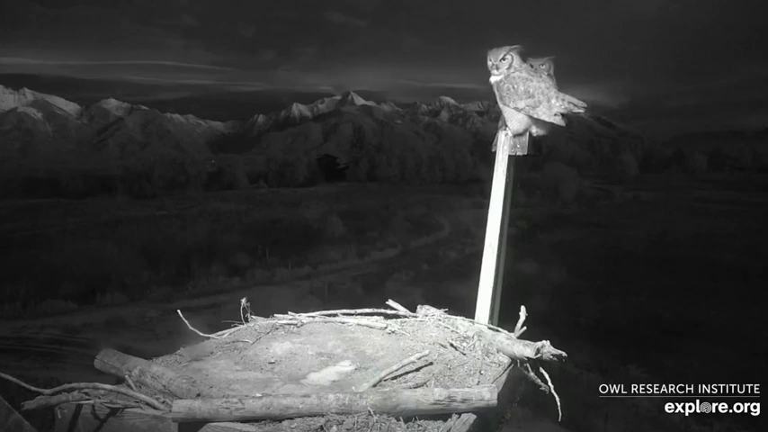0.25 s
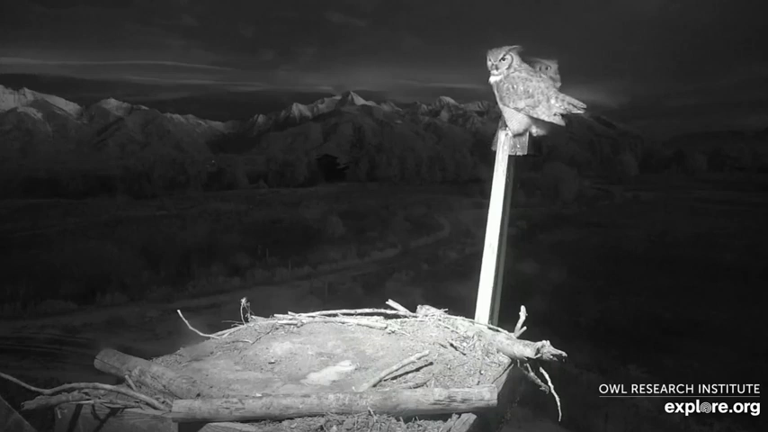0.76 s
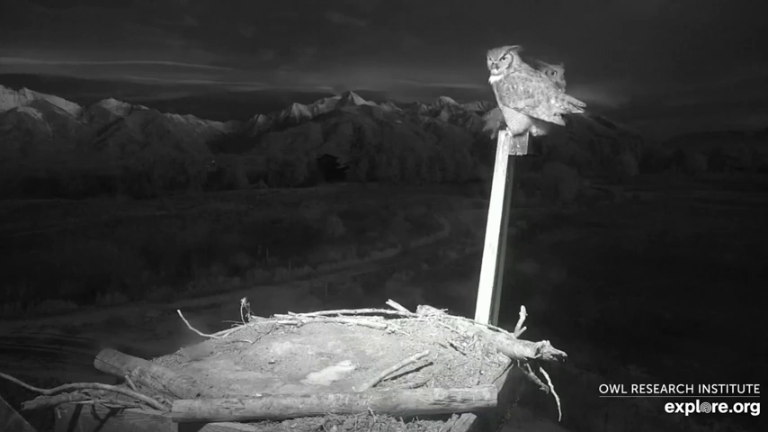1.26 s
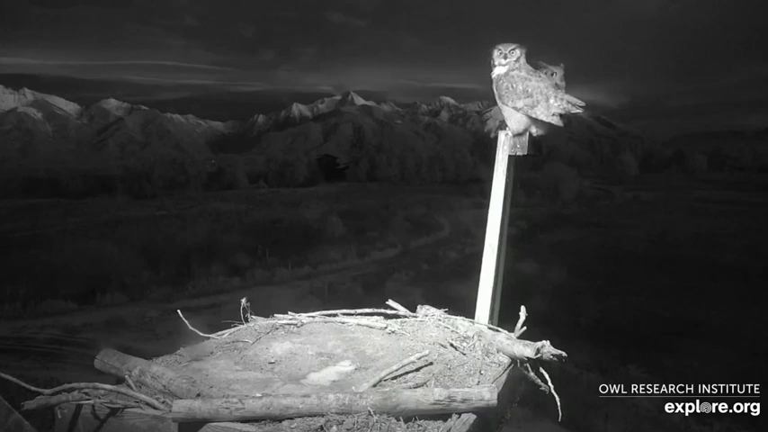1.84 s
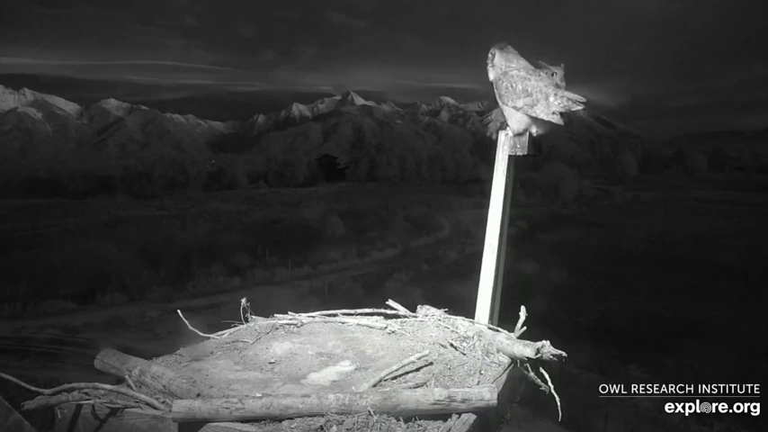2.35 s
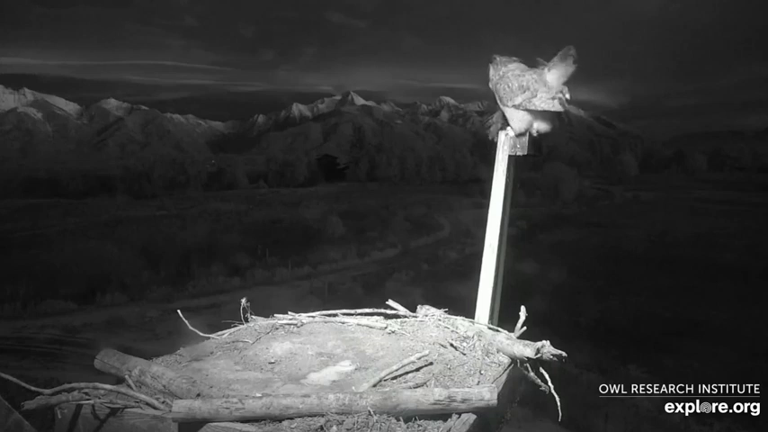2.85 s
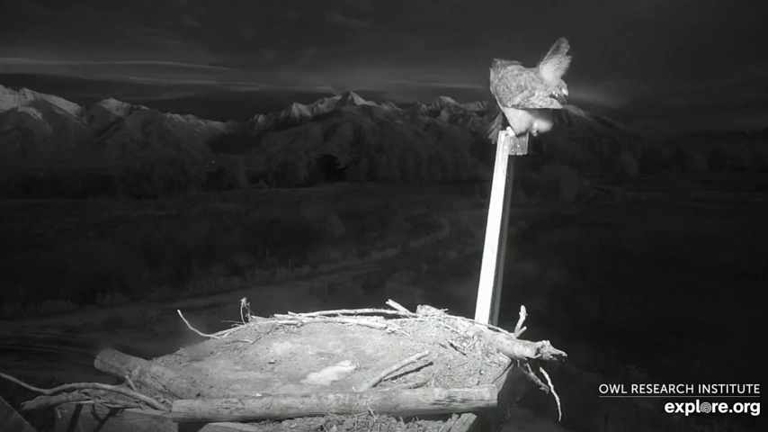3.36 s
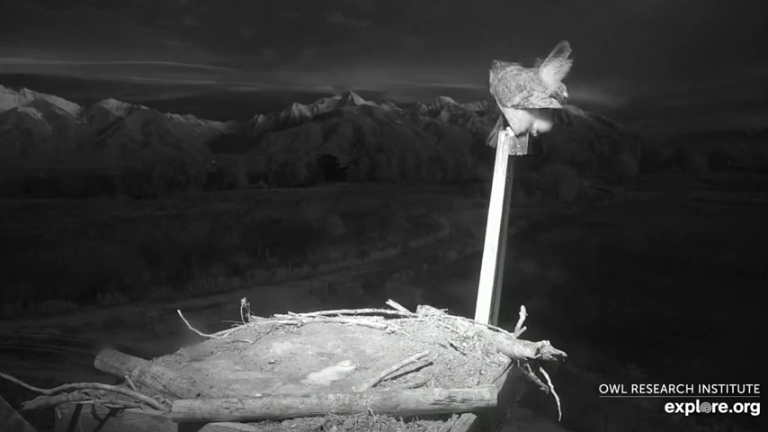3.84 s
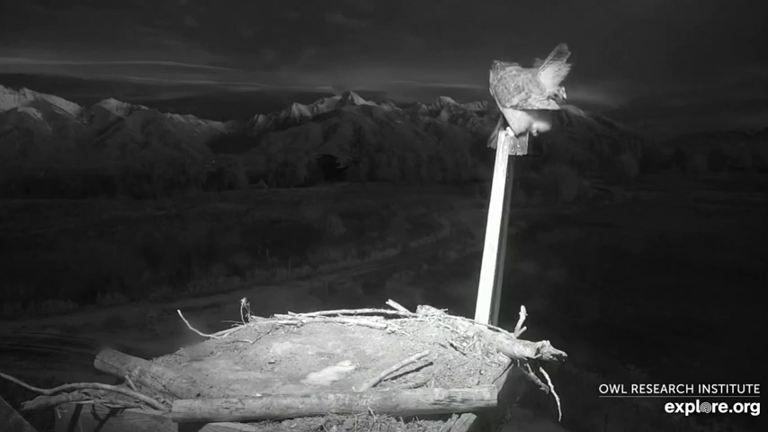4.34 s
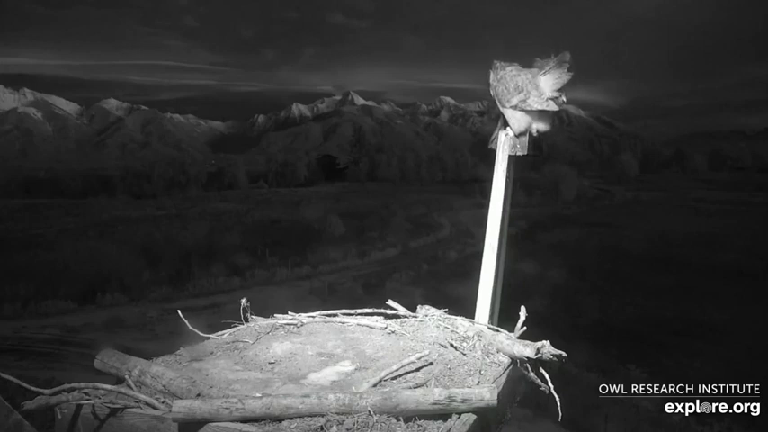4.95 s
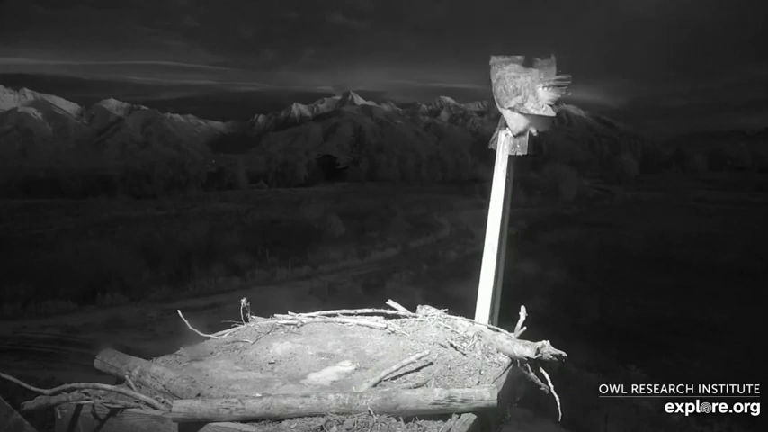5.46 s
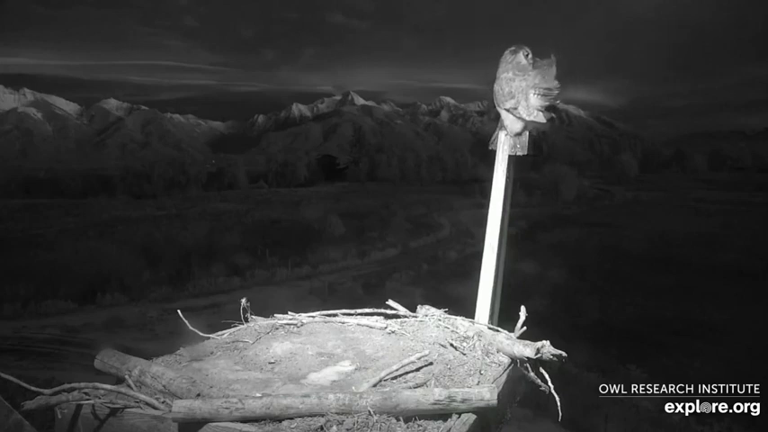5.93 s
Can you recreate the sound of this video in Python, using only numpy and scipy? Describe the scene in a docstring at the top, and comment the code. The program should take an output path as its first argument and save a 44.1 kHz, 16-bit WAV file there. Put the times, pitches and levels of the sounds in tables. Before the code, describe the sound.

Two great horned owls hoot a duet outdoors, the higher voice first and the lower answering, over faint air and hum.

```python
"""Great horned owls at dusk

A pair duets on a post in open country: the higher female first, the lower male joining on her last
note and answering. Each hoot is an almost pure tone: the push of air rises, holds and lets go, and
pitch and loudness follow it together. A faint high distortion fizz rides the loudest parts of the hoots.
At the microphone, a light breeze and the camera's fan and whine."""
import sys
import numpy as np
from scipy import signal
from scipy.fft import rfft, irfft, next_fast_len
from scipy.io import wavfile

SR = 44100
rng = np.random.default_rng(int(sys.argv[2]) if len(sys.argv) > 2 else 0)


def transcribe(u):
    """Save the signal u as a 16-bit wav file named by the first command-line argument.

    u: samples, shape (n,) or (channels, n), limited to [-1, 1]; the rate is SR.
    q: integer samples, one column per channel.
    """
    v = np.clip(np.atleast_2d(u).T, -1, 1)
    q = np.round(v * 32767).astype(np.int16)
    wavfile.write(sys.argv[1], SR, q)


N = 273287
TIME = np.arange(N) / SR


def gain_of(db):
    """Decibels to amplitude."""
    return 10 ** (np.asarray(db) / 20)


def read(points, hz):
    """Reads a spectrum on a log-frequency axis."""
    f, value = np.transpose(points)
    return np.interp(np.log(hz + 1), np.log(f + 1), value)


def add(mix, s, sound):
    """Mixes a sound in at time s."""
    part = mix[max(round(s * SR), 0):][:len(sound)]
    part += sound[:len(part)]


def bump(t, s, width):
    """A smooth swell of height 1 around time s."""
    return np.exp(-((t - s) / width) ** 2)


def noise(colour_db):
    """Noise of rms 1 whose spectrum in dB is a function of frequency."""
    size = next_fast_len(N)
    hz = np.fft.rfftfreq(size, 1 / SR)
    coloured = irfft(rfft(rng.standard_normal(size)) * gain_of(colour_db(hz)), size)[:N]
    return coloured / np.sqrt(np.mean(coloured ** 2) + 1e-20)


def drift(rate_hz):
    """A random wander of rms 1, mostly slower than the rate."""
    return noise(lambda hz: -10 * np.log10(1 + (hz / rate_hz) ** 6))


def camera_fan(speed_waver=0.0017, waver_db=1.74):
    """A faint hum by the microphone: wandering speed moves shaft orders through housing resonances."""
    # the fan creeps up in speed and fades at the end: (time [s], speed [turns/s], level [dB])
    fan_run = [(0, 38.7, 0), (1.501, 39.2, -0.5), (3.1, 39.1, 0.5), (4.4, 39.7, 1), (5.65, 39.9, 1.5),
               (6.2, 39.6, -10)]
    # its hum: (multiple of the speed, level [dB], change with speed [dB per turn/s])
    shaft_orders = [(2, -73, 4), (3, -74, 2), (4, -66.5, -3.5), (5, -76, -3), (6, -61.5, 0.5)]
    times, speeds, levels = np.transpose(fan_run)
    speed = np.interp(TIME, times, speeds)
    turns = np.cumsum(speed * (1 + speed_waver * drift(rate_hz=10.0))) / SR
    hum = np.zeros(N)
    for k, db, slope_db in shaft_orders:
        order_db = db + slope_db * (speed - speed.mean()) + waver_db * drift(rate_hz=9.8)
        hum += gain_of(order_db) * np.sin(2 * np.pi * (k * turns + rng.random()))
    return np.sqrt(2) * gain_of(np.interp(TIME, times, levels)) * hum


def camera_whine(whistle_hz=967.4, whistle_db=-72.5, fade_from_s=5.41, fade_db_per_s=10.5):
    """Thin tones from the camera's electronics waver in level; the strongest fades near the end."""
    # the fainter tones: (frequency [Hz], level [dB])
    whine_tones = [(1673, -90.5), (1760, -94.5), (2008, -94), (2342, -92), (2417, -91.5), (5643, -104)]
    faint = np.zeros(N)
    for hz, db in whine_tones:
        faint += gain_of(db + 2.04 * drift(rate_hz=3.9)) * np.sin(2 * np.pi * (hz * TIME + rng.random()))
    fade_db = fade_db_per_s * np.maximum(TIME - fade_from_s, 0)
    level_db = whistle_db + 3.0 * drift(rate_hz=5.0) - fade_db
    whistle = gain_of(level_db) * np.sin(2 * np.pi * whistle_hz * TIME)
    return np.sqrt(2) * (faint + whistle)


def air(level_db=-60.5, flicker_db=0.5):
    """A soft dull rush of open air with a trace of microphone hiss."""
    # rush and hiss: (frequency [Hz], relative density [dB])
    air_colour = [(20, -26.5), (48, -22), (70, -7.5), (130, -5), (330, 2.5), (430, -2), (550, 2),
                  (850, -4.5), (1060, -12.5), (1220, -18), (2200, -25.5), (2650, -22.5), (2900, -32),
                  (4300, -34), (4800, -31.5), (12500, -33.5), (12900, -45), (16000, -48.5)]
    return gain_of(level_db + flicker_db * drift(rate_hz=5.8)) * noise(lambda hz: read(air_colour, hz))


def breeze(calm_db=-77.5):
    """A light breeze rumbles at the microphone, swelling in a few gusts."""
    # the gusts: (time [s], half width [s], level above calm [dB])
    gusts = [(3.601, 0.856, 9), (4.649, 0.211, 5.5), (5.58, 0.24, 12.5), (6.15, 0.153, 9.5)]
    # the rumble: (frequency [Hz], relative density [dB])
    rumble_colour = [(30, -32.5), (52, -20.5), (72, -4.5), (90, -0.5), (125, -8), (200, -27.5),
                     (600, -69.5)]
    gusts_db = sum(db * bump(TIME, s, width) for s, width, db in gusts)
    return gain_of(calm_db + gusts_db) * noise(lambda hz: read(rumble_colour, hz))


def hoot(row, tremor, dips, loudness, octave, harmonics, full_db, harmonic_growth,
         onset_hz=150, swell_db_per_s=3.5, fizz_above_hz=3500, fizz_db_per_s=15.5):
    """One push of air: a near sine and its octave, louder as it climbs, with distortion fizz when loud."""
    start, length, held_hz, slope, rise_s, release_s, strength_db, fizz_db = row
    t = np.arange(0, length, 1 / SR)
    from_middle = t - length / 2
    # the pitch arches: a quick rise, a sloping hold and an ever faster fall
    rising = np.exp(-t / rise_s)
    falling = np.maximum(1 - (length - t) / release_s, 0) ** 2
    pitch = onset_hz + (held_hz + slope * from_middle - onset_hz) * (1 - rising - falling)
    pitch -= sum(drop * bump(start + t, s, width) for s, drop, width in dips)
    onset_db, db_per_hz, ceiling_db = loudness
    level_db = np.minimum(onset_db + db_per_hz * (pitch - onset_hz), ceiling_db)
    level_db += strength_db + swell_db_per_s * from_middle  # swells as the throat fills
    hz = pitch * (1 + np.interp(start + t, TIME, tremor))
    phase = 2 * np.pi * np.cumsum(hz) / SR
    tone = np.cos(phase) + gain_of(read(octave, 2 * hz)) * np.cos(2 * phase)
    drive_db = harmonic_growth * (level_db - full_db)
    # the faint distortion fizz grows with time and flares within a few Hz of the highest pitch
    flare = np.exp((pitch - pitch.max()) / 3.5)
    fizz = gain_of(fizz_db + fizz_db_per_s * from_middle + 5 * (flare - 0.5))
    for k, chance in enumerate(rng.standard_normal(size=(36, 16)), start=3):
        partial = gain_of(read(harmonics, k * hz) + drive_db) * np.cos(k * phase + 2 * np.pi * chance[-1])
        if k * held_hz > fizz_above_hz:  # each line of the fizz flickers to a new level every 35 ms
            flicker = np.interp(t / 0.035, np.arange(len(chance)), chance)
            partial *= fizz * (1 + 0.46 * flicker)
        if k * held_hz < harmonics[-1][0]:
            tone += partial
    fade = np.clip(np.minimum(t, length - t) / 0.0023, 0, 1)
    return np.sqrt(2) * gain_of(level_db) * fade * tone


def phrase(hoots, tremor_share, flutter_db, **settings):
    """One bird's run of hoots; a slight unsteadiness of pressure moves pitch and level together."""
    calls = np.zeros(N)
    pressure = drift(rate_hz=22)
    for row in hoots:
        add(calls, row[0], hoot(row, tremor_share * pressure, **settings))
    return calls * gain_of(flutter_db * pressure)


def female_owl():
    """The higher voice opens from the post with six hoots."""
    # her hoots: (start [s], length [s], held pitch [Hz], slope [Hz/s], rise [s], release [s],
    # strength [dB], distortion fizz [dB])
    hoots = [ (0.69, 0.1859, 360.2, -195, 0.02055, 0.1317, -1, 8),
             (1.073, 0.1737, 363.6, -70.5, 0.01626, 0.1037, -0.64, 7.5),
             (1.283, 0.1736, 374.3, 27.5, 0.01494, 0.1094, -0.64, 4),
             (1.422, 0.3197, 389.7, -59.5, 0.02555, 0.0892, -0.1355, 5.5),
             (2.047, 0.3501, 378.3, -95, .025, .083, 0, 2.5),
             (2.527, 0.2531, 370.6, -290, 0.02723, 0.0772, -0.01, 7), ]
    # the push slackens inside a long hoot: (time [s], pitch drop [Hz], half width [s])
    dips = [(1.56, 43.0, 0.041), (2.182, 20.0, 0.053)]
    # loudness follows pitch: (level at the onset pitch [dB], growth [dB/Hz], ceiling [dB])
    loudness = (-57.5, 0.17907, -18)
    # her octave: (frequency [Hz], level against the fundamental [dB])
    octave = [(400, 0.5), (600, -14), (700, -17.5), (745, -24), (780, -27)]
    # faint harmonics on the loudest parts, the top ones distortion: (frequency [Hz], relative level [dB])
    harmonics = [(1100, -53.5), (1480, -49.5), (1850, -53), (2220, -61), (2600, -63.5), (3300, -79.5),
                 (3850, -80.5), (4100, -72), (4400, -82.5), (7000, -85.5), (8200, -74.5), (9000, -89.5),
                 (9800, -79), (12000, -81)]
    return phrase(hoots, tremor_share=0.0012, flutter_db=0.12, dips=dips, loudness=loudness,
                  octave=octave, harmonics=harmonics, full_db=-18.5, harmonic_growth=0.4)


def male_owl():
    """The lower, less steady voice joins on her last note and answers, five hoots in all."""
    # his hoots: (start [s], length [s], held pitch [Hz], slope [Hz/s], rise [s], release [s],
    # strength [dB], distortion fizz [dB])
    hoots = [ (2.561, 0.1478, 316.8, -15.5, 0.0256, 0.0834, -.3, 6),
             (2.893, 0.3508, 306.6, -31, 0.01993, 0.0705, -0.44, 3.5),
             (3.841, 0.3791, 303.3, 38.5, 0.01875, 0.1015, 0.473, 3.5),
             (4.559, 0.30504, 305, -40, .018, .051, .1, 6),
             (5.179, 0.16745, 296.6, -43, 0.02343, 0.0737, -0.061, 3), ]
    # the push slackens inside a long hoot: (time [s], pitch drop [Hz], half width [s])
    dips = [(3.107, 9.03, 0.0108), (3.161, 8.6, 0.0164), (4.126, 21, 0.024), (4.813, 26.9, 0.0219)]
    # loudness follows pitch: (level at the onset pitch [dB], growth [dB/Hz], ceiling [dB])
    loudness = (-55, 0.21817, -21.5)
    # his octave: (frequency [Hz], level against the fundamental [dB])
    octave = [(400, -4), (560, -15), (610, -19)]
    # faint harmonics on the loudest parts, the top ones distortion: (frequency [Hz], relative level [dB])
    harmonics = [(780, -28), (860, -39.5), (890, -46.5), (915, -60.5), (1220, -49.5), (1525, -56),
                 (1830, -61), (2140, -76), (2440, -59.5), (2800, -72), (3500, -83.5), (12000, -86)]
    return phrase(hoots, tremor_share=0.0025, flutter_db=0.25, dips=dips, loudness=loudness,
                  octave=octave, harmonics=harmonics, full_db=-20.5, harmonic_growth=0.6)


def open_country(direct, scatter_db=-27, scatter_t60_s=0.14, far_db=-46, far_t60_s=1.4):
    """The direct sound, a few reflections, brief scatter from nearby brush and a faint distant tail."""
    # reflections from the post, nest and ground: (delay [s], level [dB])
    echoes = [(0.0134, -31), (.02, -33), (.043, -30), (.058, -26), (.126, -43)]
    t = np.arange(SR) / SR
    response = np.zeros(SR)
    for db, t60_s in (scatter_db, scatter_t60_s), (far_db, far_t60_s):
        tail = rng.standard_normal(SR) * gain_of(-60 * t / t60_s)
        response += gain_of(db) * tail / np.linalg.norm(tail)
    for delay, db in echoes:
        add(response, delay, gain_of([db]))
    return direct + signal.fftconvolve(direct, response)[:N]


def scene():
    """Both owls on one microphone, over the breeze and the camera's own noise."""
    owls = open_country(female_owl() + male_owl())
    return (owls + camera_fan() + camera_whine() + air() + breeze())[None]


def record(dry, sheen_hz=12870, sheen_db=-70, blur_rad=1.6, cutoff_hz=15650):
    """Loud notes carry a faint high sheen, mirrored about one frequency; then the band limit."""
    carrier = np.cos(2 * np.pi * sheen_hz * TIME + blur_rad * drift(rate_hz=35))
    sheen = 2 * gain_of(sheen_db) * dry * carrier
    lowpass = signal.firwin(511, cutoff_hz, window=("kaiser", 9), fs=SR)
    return signal.oaconvolve(dry + sheen, lowpass[None], "same")


dry = scene()
out = record(dry)
transcribe(out)
```